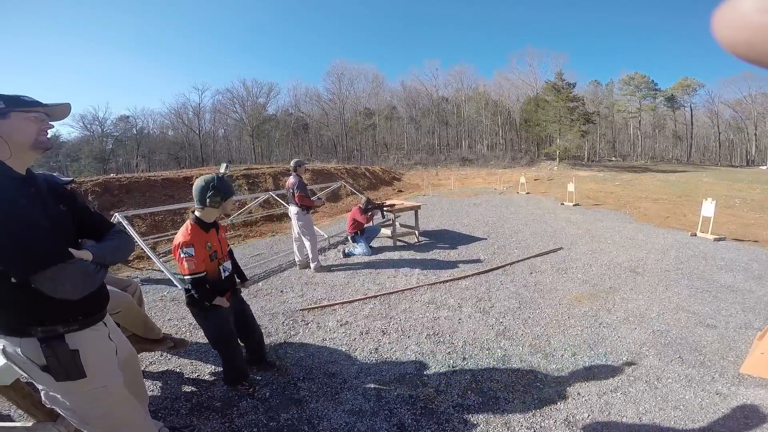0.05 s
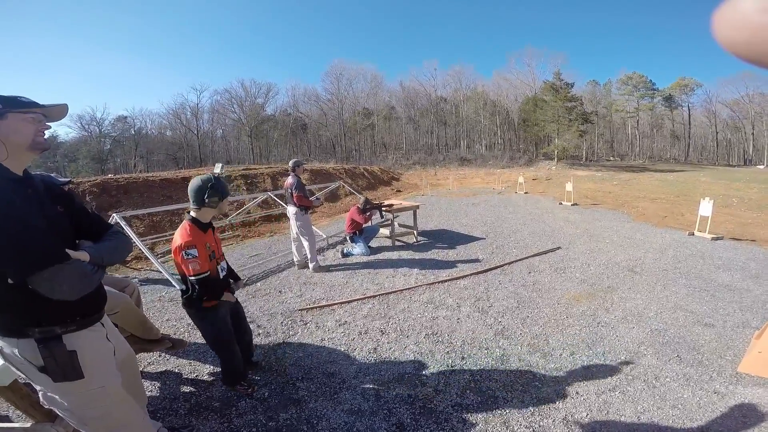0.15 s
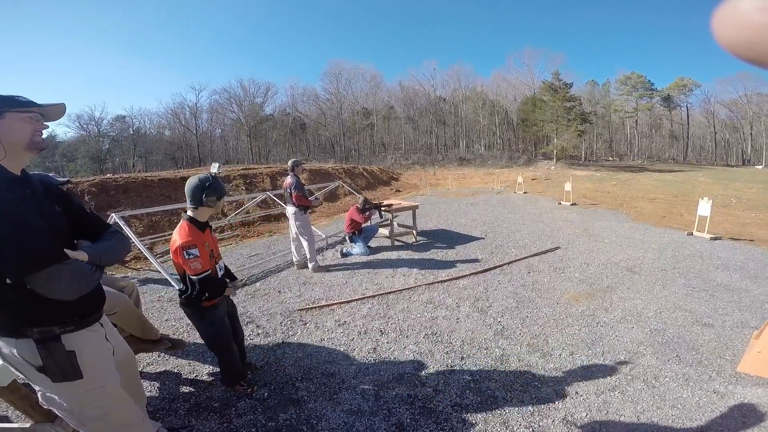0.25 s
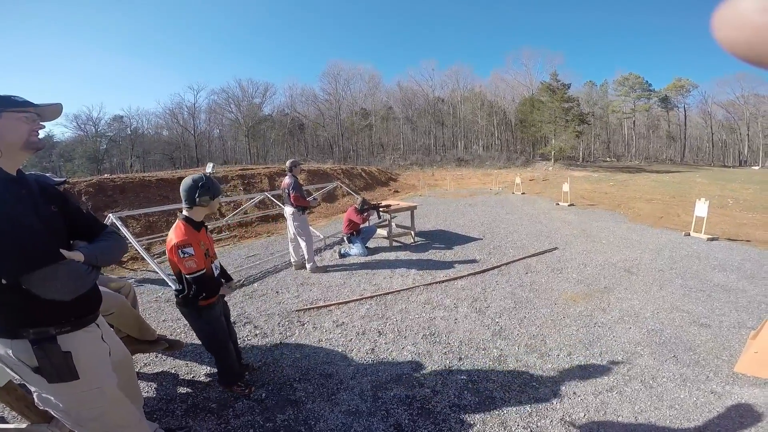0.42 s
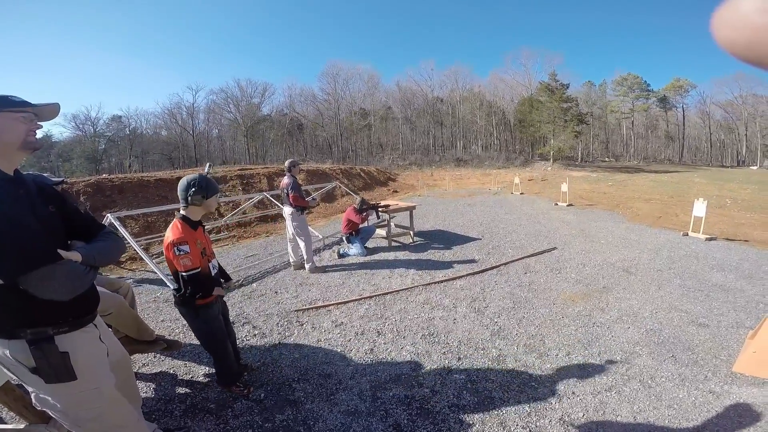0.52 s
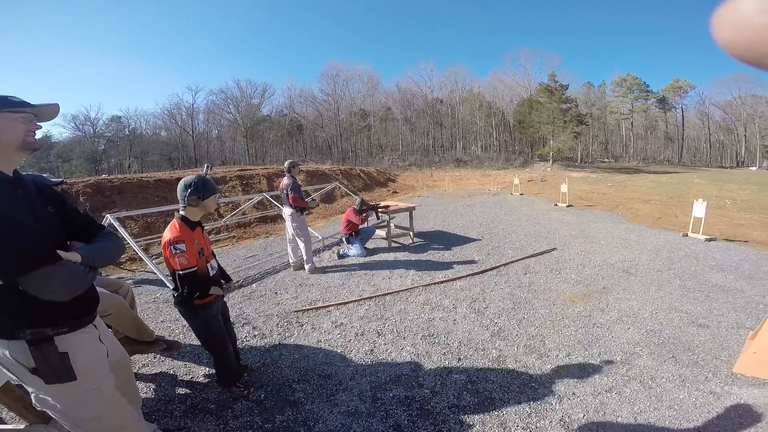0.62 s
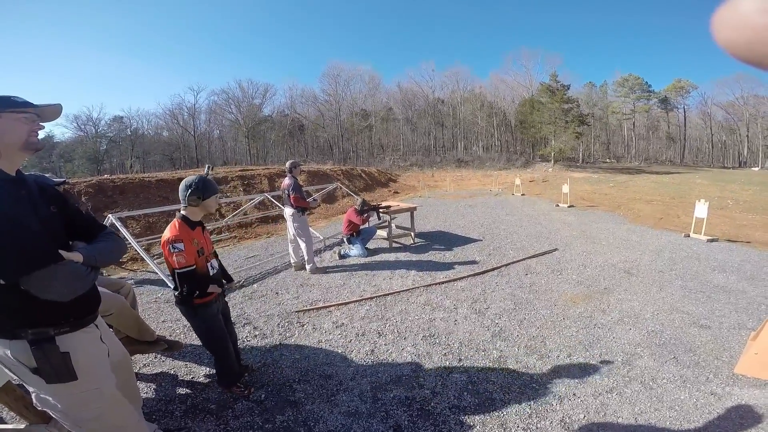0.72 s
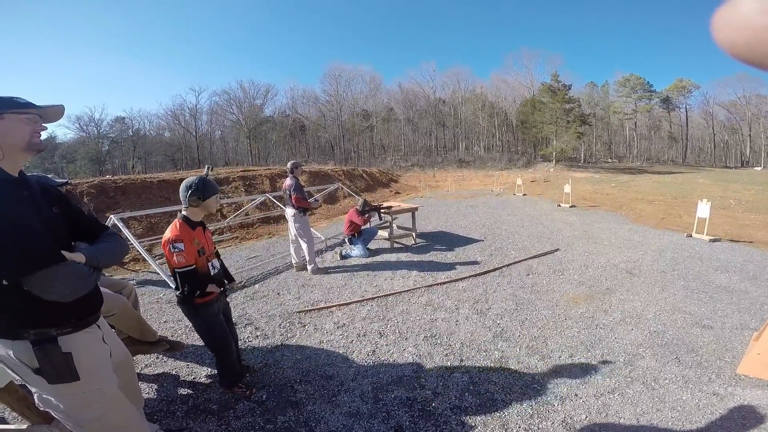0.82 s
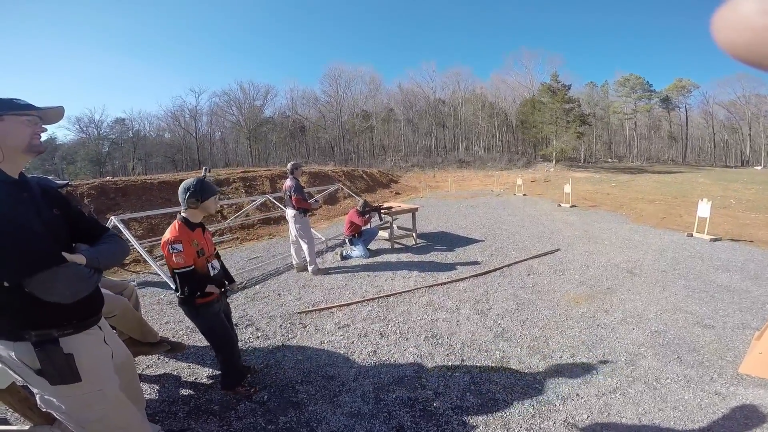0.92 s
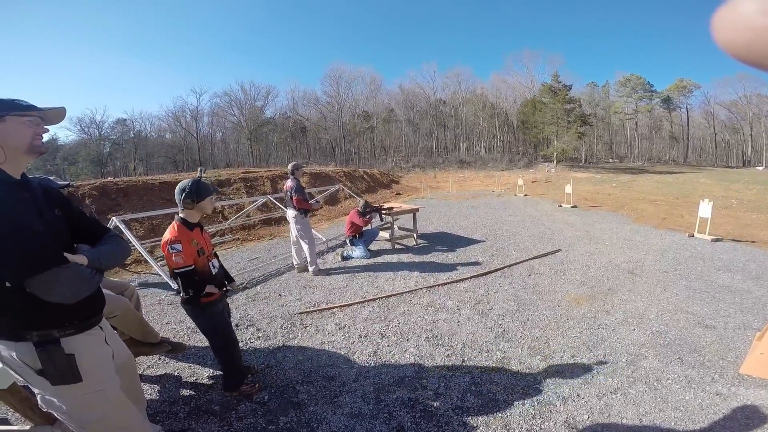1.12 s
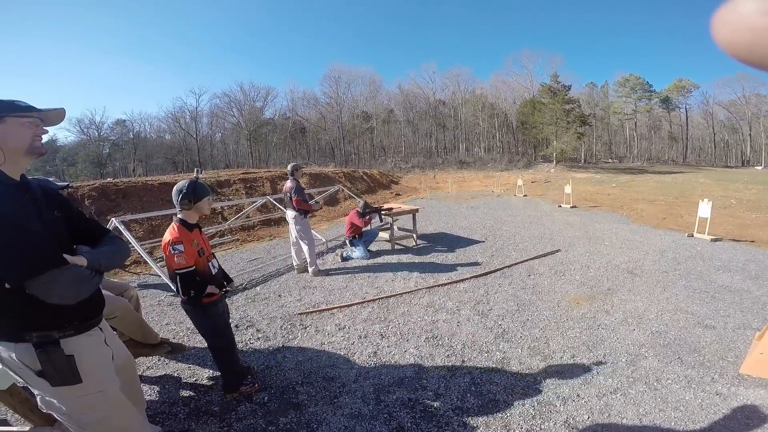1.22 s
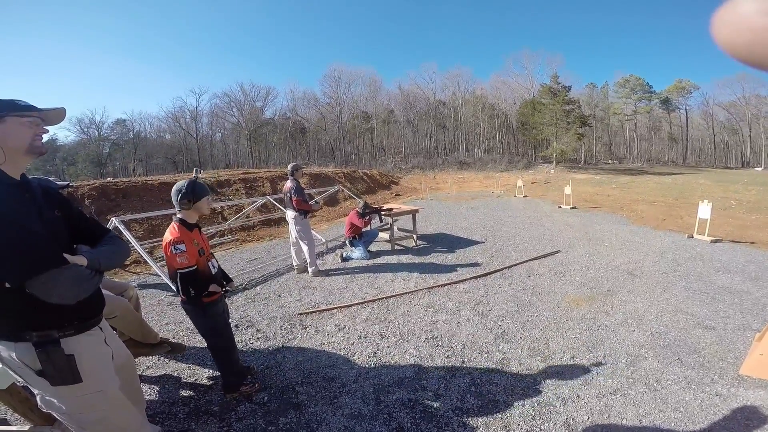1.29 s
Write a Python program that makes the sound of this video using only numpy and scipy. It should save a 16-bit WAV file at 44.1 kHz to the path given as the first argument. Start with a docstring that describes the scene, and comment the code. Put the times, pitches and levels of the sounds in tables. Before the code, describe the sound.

After a brief quiet of soft wind and faint hiss, a single gunshot cracks hard and boxy, slaps off nearby banks, rumbles and fades through the woods, while a thin brass case bounces with tiny high pings.

```python
"""Light wind and a faint electronic whine, then one pistol shot overloads a small housed microphone.
Wind, ambience, bank roll, ground scatter and the tree-line wash are shaped noise; the whine is sines.
The shot is a spike and noise bursts through housing resonances, decaying sines, echoes and late ticks.
The spent brass case bounces on the gravel: decaying sines with noise ticks.
The input saturates, ducks, recovers slowly and is band-limited."""
import sys
import numpy as np
from scipy import signal
from scipy.io import wavfile
from scipy.ndimage import uniform_filter1d

SR = 44100
rng = np.random.default_rng(int(sys.argv[2]) if len(sys.argv) > 2 else 0)


def transcribe(u):
    """Save the signal u as a 16-bit wav file named by the first command-line argument.

    u: samples, shape (n,) or (channels, n), limited to [-1, 1]; the rate is SR.
    q: integer samples, one column per channel.
    """
    v = np.clip(np.atleast_2d(u).T, -1, 1)
    q = np.round(v * 32767).astype(np.int16)
    wavfile.write(sys.argv[1], SR, q)


N = 59535

# Noise spectra, relative density: f/Hz, level/dB
WIND_SPECTRUM = [(8.8, -33), (15, 3), (36, 3.5), (102, -17.5), (134, -38), (210, -31), (250, -23.5),
                 (320, -60.5), (550, -120)]
AMBIENCE_SPECTRUM = [(88, -28.5), (150, 3.5), (318, -5.5), (590, 4.5), (804, -5), (1300, -1), (1840, -10),
                     (5640, -17.5), (6460, -14), (15100, -24.5)]
ROLL_SPECTRUM = [(24, -31), (40, -6.5), (75, -5.5), (98, -3), (194, -8.5), (353, -17.5), (450, -17),
                 (580, -37), (990, -120)]
TREES_SPECTRUM = [(88, -46), (150, -5), (300, -8.5), (600, -2.5), (1000, -3), (1500, 3), (2150, -2),
                  (2900, 2.5), (3380, 1.5), (3560, -5.5), (4030, 3), (4400, -9.5), (5200, -16.5),
                  (7000, -26.5), (9000, -33.5), (11700, -41)]
GROUND_SPECTRUM = [(24, -30), (40, 22.5), (317, -10), (903, -13.5), (1770, -9.5), (3060, -15.5),
                   (4030, -17), (4920, -30.5), (6320, -30), (15500, -53.5)]
# Wind level: t/s, level/dB
WIND_LEVEL = [(0, -50), (.1, -51.5), (.2, -50), (.36, -44), (.48, -53.5), (.62, -55), (.74, -46.5),
              (.9, -48), (1.1, -45.5), (1.22, -46), (1.3, -43), (1.35, -54)]
# Whine tones: f/Hz, rms level/dB
WHINE_TONES = [(6293, -76), (12618, -82)]
# Tree-line wash before onset fade and air loss: t/s, level/dB
TREES_LEVEL = [(0.3, -37), (0.436, -33), (0.51, -37), (0.582, -34.5), (1.098, -49), (1.35, -58.5)]
# Ground scatter decay: f/Hz, T60/s
GROUND_T60 = [(50, 0.087), (200, 0.13), (700, 0.19), (2500, 0.15), (6000, 0.28), (9000, 0.35),
              (14000, 0.57)]
# Case bounces: t/s, level/dB, lower ring re bounce/dB, band-passed noise tick re bounce/dB
BOUNCES = [(.7962, -36, -34, -6), (.8235, -52, -22, -10), (.9015, -53, -34, -3), (.9235, -56, -9, -30),
           (1.047, -67, -30, -30), (1.082, -69, -30, -6)]
# Upper ring of the case, a close pair: f/Hz, level re bounce/dB, T60/s
BRASS_RING = [(15040, 0, .2), (15105, -6, .08)]
# Microphone housing resonances: f/Hz, width/Hz, gain/dB
HOUSING_MODES = [(595.5, 140, -1), (1674, 440, -6), (2590, 326, -3.5), (3915, 350, 3), (6696, 800, -27),
                 (11500, 1700, -25.5)]
# Echoes off banks and stands, then two faint late ticks (last two rows):
# t/s, rms level before decay/dB, T60/s, f/Hz, width/Hz
ECHOES_AND_TICKS = [(.2235, -13, .015, 2000, 1800), (.2375, -24, .012, 5000, 6000),
                    (.2632, -15, .022, 3300, 2200), (.2748, -24, .03, 5900, 1800),
                    (.2752, -33, .025, 12000, 6000), (.2850, -29, .025, 6000, 1800),
                    (.5888, -34, .007, 5500, 3500), (.7662, -31, .003, 3000, 2500)]
# Low blast swings, direct and reflected, plus a 625 Hz ring of the housing (last row):
# delay/s, f/Hz, level/dB, T60/s
SWINGS_AND_RING = [(.0019, 120, 6, .022), (.0056, 105, 2, .025), (.0100, 55, -8, .06),
                   (.0150, 75, -12, .07), (.088, 60, -26, .15), (.0010, 625, -4, .04)]
# Polarity of each swing and of the ring: sign
SWING_SIGNS = [-1, 1, 1, -1, -1, 1]

SHOT_S = .2060
AMBIENCE_DB = -61.5

ROLL_DB, ROLL_T60_S, ROLL_RISE_S = -32.5, 2.4, .02
ROLL_FADE_START_S, ROLL_FADE_S = .3705, .13

TREES_START_S, TREES_RISE_S = .26, .055
TREES_PATCH_DB, TREES_FLICKER_DB = 1., 1.2
# later echoes have crossed more air; slope scales (min(f / 4 kHz, 1.3) ** power - 0.5)
AIR_SLOPE_DB_PER_S, AIR_POWER, AIR_NEUTRAL_S = -14, 2, .65

GROUND_DB, GROUND_RISE_S = -3, .0027
GROUND_END_S, GROUND_END_FADE_S, GROUND_PAST_DB = .288, .01, -7  # open ground past the nearest banks

BRASS_RISE_S, BRASS_LOW_HZ, BRASS_LOW_T60_S = .002, 11130, .35
TICK_HZ, TICK_WIDTH_HZ, TICK_T60_S = 7500, 6000, .02
TUMBLE_DB, TUMBLE_S = 3, .006

# levels into the housing
CRACK_DB, CRACK_HOLD_S, CRACK_T60_S = 16, .003, .007
SPIKE_DB, SPIKE_SAMPLES = 17, 3
BODY_DB, BODY_T60_S, BODY_HZ = -.5, .032, 2380  # level before the low-pass
ECHO_RISE_S = .001

CEILING, EDGE_HZ = .99, 15500
DUCK_START_DB, DUCK_SHARE, DUCK_LAG_S = -41, .35, .0093  # share: dB cut per dB over start
DUCK_RECOVER_DB_PER_S = 11


def amp(db):
    """dB to linear gain."""
    return 10 ** (np.asarray(db, float) / 20)


def decay_db(t, t60_s):
    """Exponential decay: 60 dB down per T60."""
    return -60 * t / t60_s


def sine(hz, t):
    """Unit sine."""
    return np.sin(2 * np.pi * hz * t)


def evened(x):
    """Scale to rms 1."""
    return x / np.sqrt(np.mean(x ** 2) + 1e-20)


def read(points, hz):
    """Interpolate a table over log frequency."""
    f, value = np.transpose(points)
    return np.interp(np.log(hz + 1), np.log(f + 1), value)


def level_over_time(points, t):
    """Gain from a t/s, level/dB table."""
    return amp(np.interp(t, *np.transpose(points)))


def add(mix, start_s, sound):
    """Add a sound in place, cut at the end of the mix."""
    part = mix[round(start_s * SR):][:len(sound)]
    part += sound[:len(part)]


def low_pass(x, hz):
    """One-pole low-pass."""
    r = np.exp(-2 * np.pi * hz / SR)
    return signal.lfilter([1 - r], [1, -r], x)


def resonate(x, hz, width_hz):
    """Fixed resonance of gain 1: shift to 0 Hz, smooth, shift back."""
    turn = np.exp(2j * np.pi * hz * np.arange(len(x)) / SR)
    r = np.exp(-np.pi * width_hz / SR)
    return 2 * (turn * signal.lfilter([1 - r], [1, -r], x / turn)).real


def resonate_twice(x, hz, width_hz):
    """Two equal resonances in series, for steeper skirts."""
    return resonate(resonate(x, hz, width_hz), hz, width_hz)


def noise(spectrum, field_db=lambda t, hz: 0, size=512, patch_db=0., flicker_db=0.):
    """Random short-time spectra, rms 1 before the dB field over time and pitch is applied."""
    hop = size // 4
    frames = N // hop + 5
    hz = np.fft.rfftfreq(size, 1 / SR)[:, None]
    real, imag, patches = rng.standard_normal((frames, len(hz), 3)).T
    patches = uniform_filter1d(patches, size=6, axis=0)
    patches = evened(uniform_filter1d(patches, size=8, axis=1))
    flicker = evened(uniform_filter1d(rng.standard_normal(frames), size=2))
    inside = (hz >= spectrum[0][0]) & (hz <= spectrum[-1][0])
    gain = amp(read(spectrum, hz) + patch_db * patches + flicker_db * flicker)
    z = (real + 1j * imag) * inside * gain
    scale = np.std(signal.istft(z, nperseg=size, noverlap=size - hop)[1])
    frame_s = np.arange(frames)[None] * hop / SR
    z = z * amp(field_db(frame_s, hz)) / scale
    return signal.istft(z, nperseg=size, noverlap=size - hop)[1][:N]


def background():
    """Lumpy wind on the microphone, distant ambience with hiss, and two thin whine tones."""
    t = np.arange(N) / SR
    wind = level_over_time(WIND_LEVEL, t) * noise(WIND_SPECTRUM, size=4096)
    ambience = amp(AMBIENCE_DB) * noise(AMBIENCE_SPECTRUM, size=1024)
    whine = sum(np.sqrt(2) * amp(db) * sine(hz, t) for hz, db in WHINE_TONES)
    return wind + ambience + whine


def roll():
    """Low rumble that rolls along the banks, then drops away."""
    t = np.arange(N) / SR
    since_s = t - SHOT_S
    level = amp(ROLL_DB + decay_db(since_s, ROLL_T60_S))
    rise = np.clip(since_s / ROLL_RISE_S, 0, 1)
    fade = np.clip((ROLL_FADE_START_S - t) / ROLL_FADE_S + 1, 0, 1)
    return level * rise * fade * noise(ROLL_SPECTRUM, size=512)


def trees():
    """Far wash off the tree line: swells in after a gap and dulls with air loss."""
    def air_db(t, hz):
        loss = np.minimum(hz / 4000, 1.3) ** AIR_POWER - .5
        return AIR_SLOPE_DB_PER_S * loss * (t - AIR_NEUTRAL_S)

    t = np.arange(N) / SR
    rise = np.clip((t - TREES_START_S) / TREES_RISE_S, 0, 1)
    wash = noise(TREES_SPECTRUM, air_db, size=512,
                 patch_db=TREES_PATCH_DB, flicker_db=TREES_FLICKER_DB)
    return level_over_time(TREES_LEVEL, t) * rise * wash


def ground():
    """Dense near scatter, each band dying at its own speed, thinning out past the banks."""
    def fall_db(t, hz):
        return decay_db(np.maximum(t - SHOT_S, 0), read(GROUND_T60, hz))

    t = np.arange(N) / SR
    scatter = noise(GROUND_SPECTRUM, fall_db, size=256)
    past_db = GROUND_PAST_DB * np.clip((t - GROUND_END_S) / GROUND_END_FADE_S, 0, 1)
    rise = np.clip((t - SHOT_S) / GROUND_RISE_S, 0, 1)
    return amp(GROUND_DB + past_db) * scatter * rise


def tumble():
    """Ring gain as the spinning case turns towards and away: smoothed random dB."""
    width = round(TUMBLE_S * SR)
    drift = uniform_filter1d(rng.standard_normal(N), size=width)
    drift = evened(uniform_filter1d(drift, size=width))
    return amp(TUMBLE_DB * np.tanh(drift))


def brass():
    """Each bounce is a bright noise tick plus the decaying rings of the thin case."""
    rings, ticks = np.zeros(N), np.zeros(N)
    t = np.arange(SR // 3) / SR
    upper = sum(amp(db + decay_db(t, t60_s)) * sine(hz, t) for hz, db, t60_s in BRASS_RING)
    lower = amp(decay_db(t, BRASS_LOW_T60_S)) * sine(BRASS_LOW_HZ, t)
    rise = np.minimum(t / BRASS_RISE_S, 1)
    for start_s, db, low_db, tick_db in BOUNCES:
        add(rings, start_s, amp(db) * rise * (upper + amp(low_db) * lower))
        grit = rng.standard_normal(len(t)) * amp(decay_db(t, TICK_T60_S))
        tick = resonate_twice(grit, TICK_HZ, TICK_WIDTH_HZ)
        add(ticks, start_s, amp(db + tick_db) * tick)
    return rings * tumble() + ticks


def echoes_and_ticks():
    """Echoes off banks and stands, then two faint late ticks: band-limited decaying noise."""
    out = np.zeros(N)
    t = np.arange(SR // 4) / SR
    rise = np.minimum(t / ECHO_RISE_S, 1)
    for start_s, db, t60_s, hz, width_hz in ECHOES_AND_TICKS:
        burst = evened(resonate_twice(rng.standard_normal(len(t)), hz, width_hz))
        add(out, start_s, amp(db + decay_db(t, t60_s)) * rise * burst)
    return out


def swings_and_ring():
    """Low blast swings, direct and reflected, plus a 625 Hz ring of the housing: decaying sines."""
    out = np.zeros(N)
    t = np.arange(SR // 4) / SR
    for (delay_s, hz, db, t60_s), sign in zip(SWINGS_AND_RING, SWING_SIGNS):
        add(out, SHOT_S + delay_s, sign * amp(db + decay_db(t, t60_s)) * sine(hz, t))
    return out


def housing(x):
    """Plastic shell around the microphone: broad resonances of alternating polarity."""
    return sum((-1) ** k * amp(db) * resonate(x, hz, width_hz)
               for k, (hz, width_hz, db) in enumerate(HOUSING_MODES))


def muzzle_blast():
    """Spike, crack of dense pressure spikes, and duller body noise that outlasts it."""
    out = np.zeros(N)
    t = np.arange(SR // 4) / SR
    crack_db = CRACK_DB + decay_db(np.maximum(t - CRACK_HOLD_S, 0), CRACK_T60_S)
    crack = amp(crack_db) * rng.standard_normal(len(t))
    crack[:SPIKE_SAMPLES] += amp(SPIKE_DB)
    body = amp(BODY_DB + decay_db(t, BODY_T60_S)) * rng.standard_normal(len(t))
    add(out, SHOT_S, crack + low_pass(body, BODY_HZ))
    return out


def shot():
    """Muzzle blast through the housing resonances; the other parts are added unfiltered."""
    return housing(muzzle_blast()) + swings_and_ring() + echoes_and_ticks()


def scene():
    """Sum of all layers, one channel."""
    return (shot() + ground() + roll() + trees() + brass() + background())[None]


def record(dry):
    """Input saturates, gain control ducks after the blast and recovers slowly; then the band limit."""
    hot = CEILING * np.tanh(dry / CEILING)
    power = abs(uniform_filter1d(hot[0] ** 2, size=200))
    power_db = 10 * np.log10(power + 1e-12)
    # running peak of the wanted cut, released at a constant dB rate
    release_db = np.arange(N) * DUCK_RECOVER_DB_PER_S / SR
    wanted_db = DUCK_SHARE * (power_db - DUCK_START_DB)
    cut_db = np.maximum(np.maximum.accumulate(wanted_db + release_db) - release_db, 0)
    # delay by one lag, then average over one lag
    lag = round(DUCK_LAG_S * SR)
    cut_db = np.convolve(np.r_[np.zeros(lag), cut_db], np.ones(lag) / lag)[:N]
    band_limit = signal.firwin(511, EDGE_HZ, window=("kaiser", 9), fs=SR)
    return signal.oaconvolve(hot / amp(cut_db), band_limit[None], "same")


dry = scene()
out = record(dry)
transcribe(out)
```